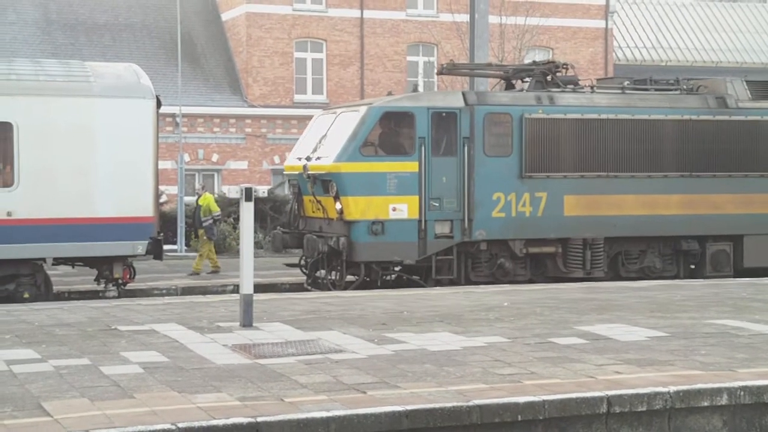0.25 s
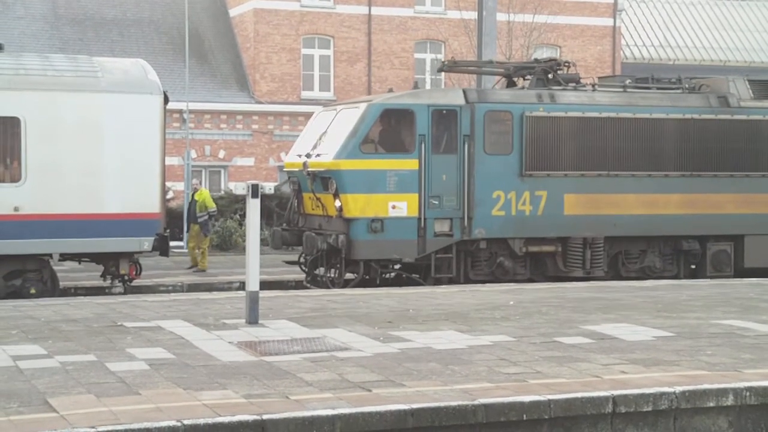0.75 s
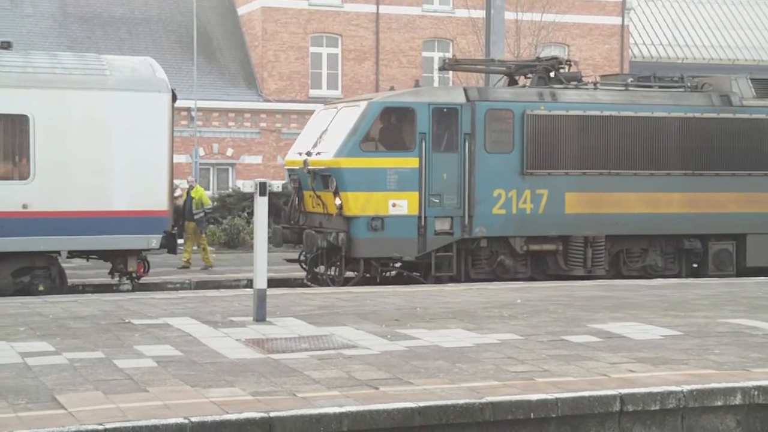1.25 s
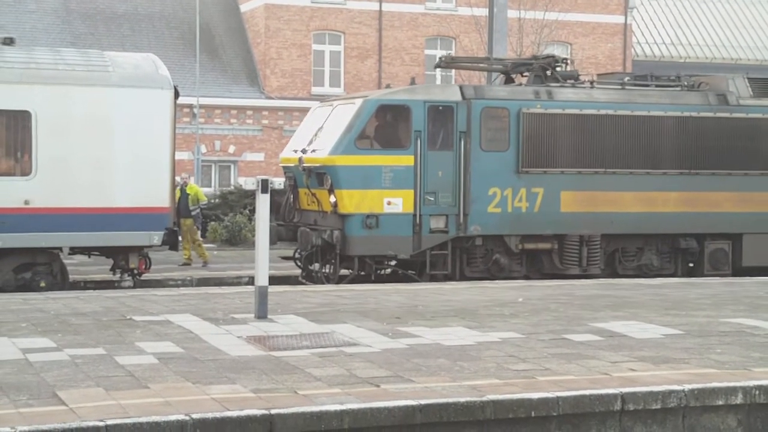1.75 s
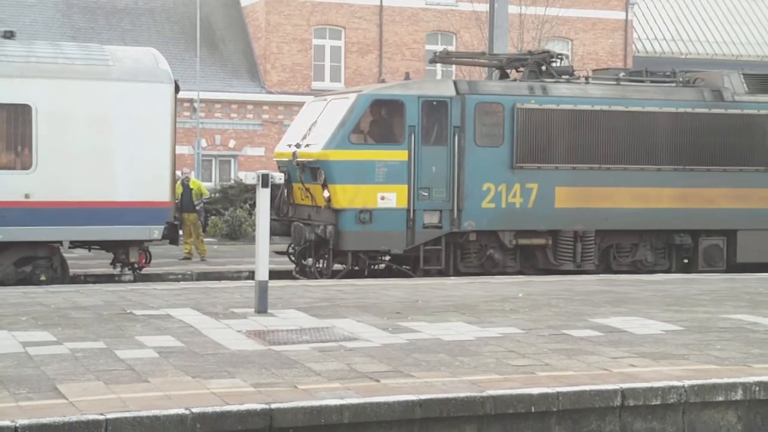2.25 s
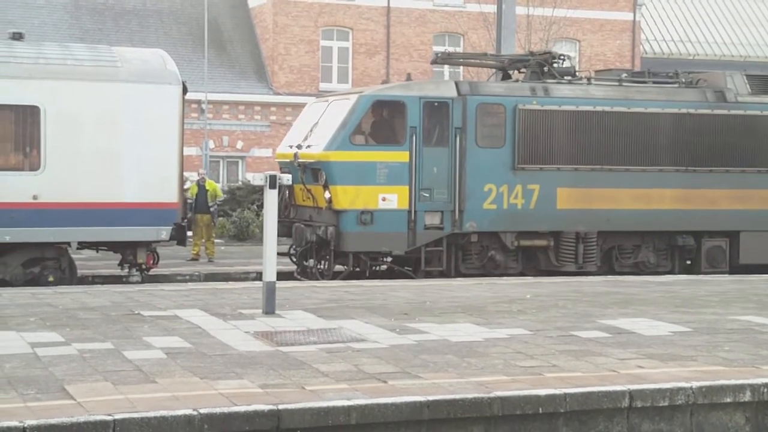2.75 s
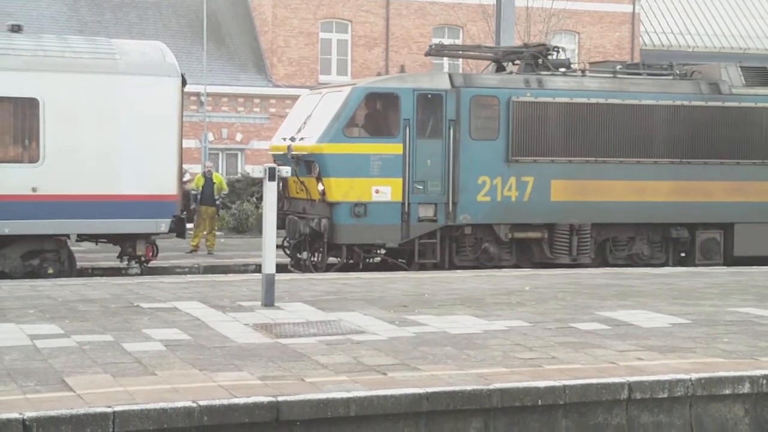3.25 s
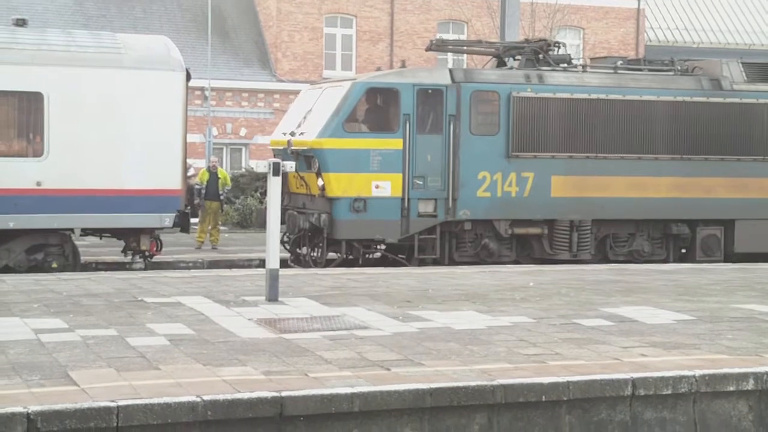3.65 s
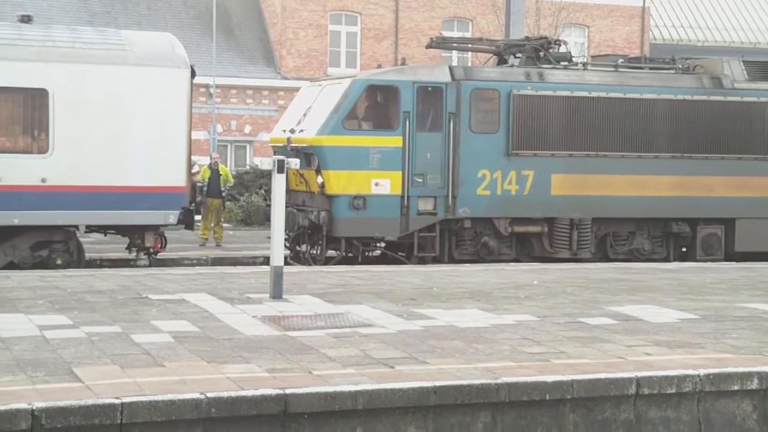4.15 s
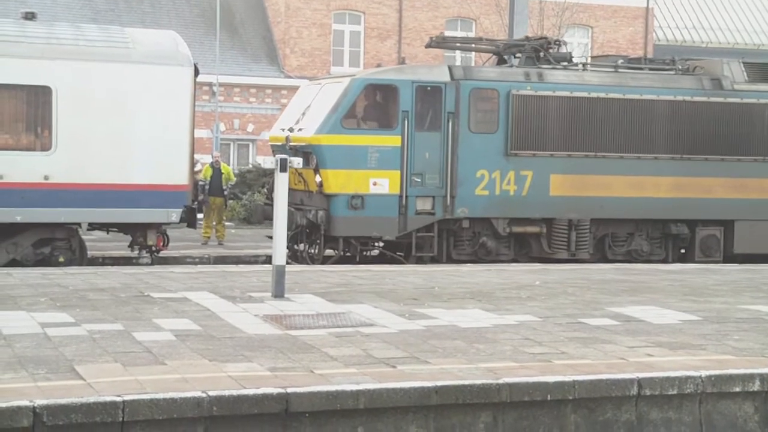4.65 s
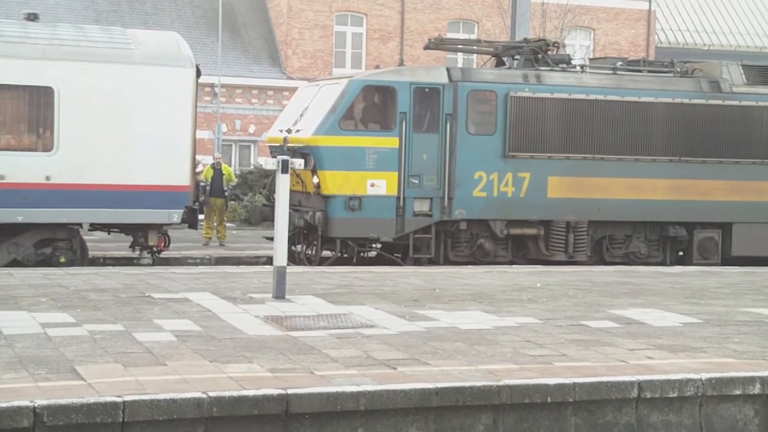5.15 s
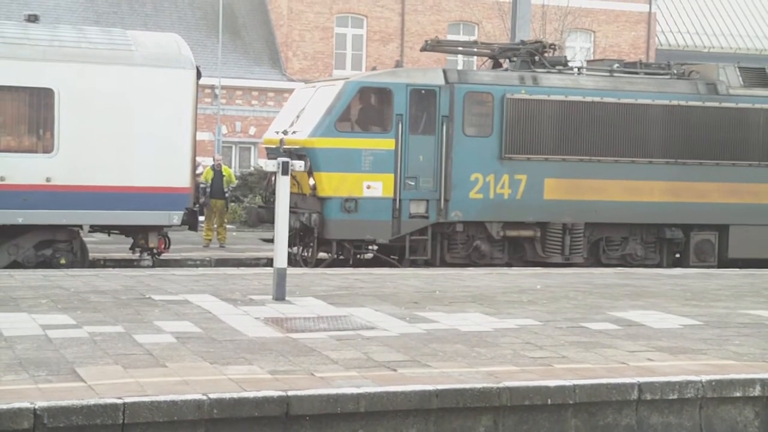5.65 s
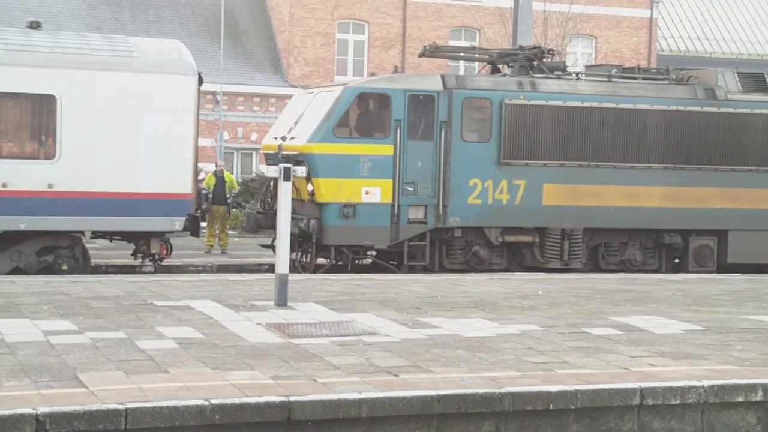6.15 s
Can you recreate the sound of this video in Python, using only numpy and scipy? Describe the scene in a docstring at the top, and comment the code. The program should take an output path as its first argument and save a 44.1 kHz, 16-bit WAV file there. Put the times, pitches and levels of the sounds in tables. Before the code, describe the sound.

An electric locomotive stands at a station with its cooling blowers running. An even, whirring rush of air with a hollow low body continues throughout. Above it sits a thin high fan whine that holds its pitch while gently swelling and throbbing. The rush grows slightly brighter, then eases near the end. It is heard from across the platform.

```python
"""An electric locomotive stands across a station platform with its cooling blowers running.
From the start, turbulent air rushes through resonant ducts and louvres, while fan blade tones whine
over it and a louvre edge whistles faintly. One fan's tone swells and sags; another's throbs.
The rush near 2 kHz grows for about five seconds, then eases. All of it is heard through two narrow
microphone ports that resonate at slightly different pitches."""
import sys
import numpy as np
from scipy import signal
from scipy.fft import rfft, irfft, next_fast_len
from scipy.io import wavfile
from scipy.ndimage import uniform_filter1d

SR = 44100
rng = np.random.default_rng(int(sys.argv[2]) if len(sys.argv) > 2 else 0)


def master(y):
    """Save y as 16-bit WAV."""
    cut = np.clip(np.atleast_2d(y).T, -1, 1)
    pcm = np.round(cut * 32767)  # scale
    wavfile.write(sys.argv[1], SR, pcm.astype(np.int16))


N = 281799


def undb(db):
    """Amplitude ratio of a level: tenfold for every 20 dB."""
    return 10 ** (np.asarray(db) / 20)


def over_hz(table, hz):
    """Columns of a table interpolated on a log-frequency axis."""
    row_hz, *columns = np.transpose(table)
    return [np.interp(np.log(hz), np.log(row_hz), column) for column in columns]


def over_time(table):
    """Columns of a table interpolated linearly in time."""
    time_s, *columns = np.transpose(table)
    return [np.interp(np.arange(N) / SR, time_s, column) for column in columns]


def wander(rate_hz):
    """Low-pass random modulation: held values smoothed twice, with a spread near 1."""
    hold = int(SR / rate_hz)
    steps = np.repeat(rng.standard_normal(N // hold + 1), hold)
    return 1.24 * uniform_filter1d(uniform_filter1d(steps, hold), hold)[:N]


def filtered(channels, response):
    """Linear filtering: each spectrum is multiplied by response(hz); mirrored ends avoid clicks."""
    edge = 4096
    size = next_fast_len(N + 2 * edge)
    padded = np.pad(channels, [(0, 0), (edge, size - N - edge)], mode="reflect")
    hz = np.maximum(np.fft.rfftfreq(size, 1 / SR), 1)
    return irfft(rfft(padded) * response(hz), size)[:, edge:edge + N]


def air_rush(swell_db=.15, flicker_db=.7, bright_hz=2050, bright_reach_octaves=.55):
    """Turbulence makes broadband noise, which duct and louvre resonances lift into peaks."""
    # Spectral density of the cooling air's noise: frequency_hz, level_db
    air_spectrum = [(25, -120), (45, -108), (70, -91), (98, -80.5), (118, -77.5), (142, -62.5), (165, -58),
                    (440, -62), (520, -69.5), (555, -69), (655, -71.5), (800, -69), (1400, -71),
                    (1680, -70.5), (2010, -69.5), (2300, -68.5), (2950, -70.5), (3060, -74.5),
                    (3200, -71.5), (3650, -74.5), (5000, -95.5), (10600, -89)]
    # Duct and louvre resonances: centre_hz, width_hz, peak_db
    duct_modes = [(204, 36, -61), (331, 42, -59.5), (391.5, 40, -59.5), (425.5, 33, -60), (766.6, 39, -66),
                  (953, 250, -72), (1183, 184, -68.5), (193, 9, -59), (315, 10, -60), (347, 12, -62),
                  (387, 9, -58), (437, 10, -61), (600, 28, -68.5), (900, 36, -70.5), (1203, 32, -66.5),
                  (1450, 90, -75), (1110, 16, -73), (1512, 24, -72), (1835, 150, -66.7), (2870, 67, -74),
                  (3478, 445, -73), (4720, 840, -89.5)]
    # Slow lift of the rush around bright_hz: time_s, gain_db
    brightness = [(0, 0), (1.5, 0.9), (3, 2), (5.4, 3), (6.39, 1.3)]
    # Slow load on the blowers: time_s, gain_db
    blower_load = [(0, -0.5), (1.6, -0.33), (3.5, -0.4), (6.39, 0)]
    hz = np.maximum(np.fft.rfftfreq(N, 1 / SR), 1)
    power = undb(over_hz(air_spectrum, hz)[0]) ** 2
    for centre_hz, width_hz, peak_db in duct_modes:
        power += undb(peak_db) ** 2 / (1 + (2 * (hz - centre_hz) / width_hz) ** 2) ** 2
    spectrum = rfft(rng.standard_normal(N)) * np.sqrt(power * SR / 2)
    bright_db = over_time(brightness)[0]
    swell = wander(1.83)
    rush = 0
    for octave in np.arange(4, 14.5, .5):  # half-octave bands swell together and flicker alone
        band_share = np.clip(1 - 2 * np.abs(np.log2(hz) - octave), 0, 1)
        bright_share = np.clip(1.5 * (1 - abs(octave - np.log2(bright_hz)) / bright_reach_octaves), 0, 1)
        gain_db = bright_share * bright_db + swell_db * swell + flicker_db * wander(11)
        rush += irfft(spectrum * band_share, N) * undb(gain_db)
    return undb(over_time(blower_load)[0]) * rush


def blade_tone(pitch_hz, level_db, drift_hz, waver_db):
    """Periodic blade passage makes a tone; turbulence modulates its frequency and amplitude."""
    cycles = np.cumsum(pitch_hz + drift_hz * wander(6)) / SR + rng.random()
    rms = undb(level_db + waver_db * wander(10))
    return np.sqrt(2) * rms * np.sin(2 * np.pi * cycles)


def fan_whine(first_hz=1838.9, second_hz=1788.1, upper_hz=2823):
    """The blade tones of several fans superpose, and those close in pitch beat."""
    # The first fan's tone swells and sags: time_s, level_db
    first_swell = [(0, -48.5), (.15, -46.5), (.38, -53), (.65, -44.3), (1.15, -45), (1.65, -42),
                   (1.85, -43), (2.1, -38.8), (2.5, -42), (2.7, -40.3), (2.95, -41.3), (3.25, -45),
                   (3.5, -41.3), (4.05, -41.8), (4.25, -45), (4.45, -41.7), (4.85, -41.8), (5.05, -46),
                   (5.3, -42.8), (5.6, -44.5), (6, -41.5), (6.25, -47), (6.39, -43.5)]
    # The second fan's tone throbs about twice a second: time_s, level_db
    second_throb = [(0, -49.5), (.2, -52.5), (.5, -48), (.75, -55), (.92, -44.5), (1.15, -46), (1.37, -55),
                    (1.5, -48), (1.72, -55), (2.1, -46.5), (2.33, -42.5), (2.47, -54), (2.65, -45),
                    (2.82, -53), (3, -44), (3.2, -48.5), (3.5, -44.5), (3.68, -53), (3.8, -45), (4.15, -45),
                    (4.55, -49), (4.72, -42), (5, -46.5), (5.2, -54), (5.55, -41.5), (5.75, -43),
                    (5.95, -50), (6.1, -44.5), (6.39, -51)]
    # Slow swell of the second fan's octave and of the upper tone: time_s, octave_db, upper_db
    high_swells = [(0, -60, -55), (.35, -55, -53), (.6, -59, -53), (1, -52.5, -53), (1.5, -62, -60),
                   (2.05, -60, -58), (2.3, -54, -57), (3, -53, -55), (3.4, -53.5, -56), (3.6, -51, -60),
                   (4, -54, -62), (4.2, -61, -52), (4.6, -64, -58), (4.9, -58, -58), (5.5, -59, -56),
                   (6.39, -62, -57)]
    # Fainter, steadier blade tones: pitch_hz, level_db
    faint_tones = [(1886, -58), (1929.6, -53), (1984, -55), (3677.5, -63.5)]
    octave_db, upper_db = over_time(high_swells)
    whine = blade_tone(first_hz, over_time(first_swell)[0], drift_hz=.5, waver_db=.5)
    whine += blade_tone(second_hz, over_time(second_throb)[0], drift_hz=1.1, waver_db=.7)
    whine += blade_tone(2 * second_hz, octave_db, drift_hz=1.2, waver_db=1.2)
    whine += blade_tone(upper_hz, upper_db, drift_hz=2.5, waver_db=1.5)
    for pitch_hz, level_db in faint_tones:
        whine += blade_tone(pitch_hz, level_db, drift_hz=1.1, waver_db=1.8)
    return whine


def louvre_whistle(pitch_hz=4825, width_hz=50):
    """Edge tone: air passing a louvre edge hisses in one narrow band."""
    # The whistle fades, then returns: time_s, level_db
    envelope = [(0, -64), (.6, -70), (1.3, -76), (2.5, -76), (4.3, -77), (5.2, -67), (6.39, -69)]
    band_hz = pitch_hz + width_hz * np.array([-.5, .5])
    hiss = signal.sosfilt(signal.butter(2, band_hz, "band", fs=SR, output="sos"), rng.standard_normal(N))
    return hiss / hiss.std() * undb(over_time(envelope)[0])


def stereo_image(direct_air, scattered_air, tones):
    """Level, phase and likeness of the left and right channels, by frequency."""
    # Left channel against right: frequency_hz, left_minus_right_db, left_lead_rad, correlation
    left_right = [(40, .1, 0, .93), (72, .3, 0, .88), (105, .15, 0, .965), (130, 0, 0, .998),
                  (150, 0, 0, .9995), (180, 0, 0, .9998), (330, 0, .015, .9983), (460, 0, .05, .995),
                  (520, -.1, .07, .988), (600, .6, .11, .971), (690, .7, .04, .974), (800, .35, .06, .985),
                  (900, .2, .04, .986), (1040, .25, .11, .972), (1200, .5, .14, .967),
                  (1370, .7, .07, .965), (1580, .4, .03, .978), (1840, .75, .18, .95), (2100, .9, .2, .95),
                  (2800, 1.1, .27, .94), (3150, .95, .02, .885), (3620, .2, .02, .94),
                  (4150, .35, .08, .89), (4800, -.4, .04, .905), (5500, 0, .08, .86), (6200, -3, .25, .57),
                  (7000, -3, 1.4, .72), (7500, 0, 1.4, .86), (8100, 2, 1.05, .72), (9400, 1.5, 1.05, .53),
                  (10500, -.3, .2, .71)]
    opposite, both = np.array([[1], [-1]]), np.ones((2, 1))

    def correlation(hz):
        return np.clip(over_hz(left_right, hz)[2], 0, 1)

    def panning(hz):
        pan_db, lead_rad, _ = over_hz(left_right, hz)
        return undb(opposite * pan_db / 2) * np.exp(1j * opposite * lead_rad / 2)

    in_phase = filtered(both * direct_air, lambda hz: np.sqrt((1 + correlation(hz)) / 2))
    antiphase = filtered(opposite * scattered_air, lambda hz: np.sqrt((1 - correlation(hz)) / 2))
    return filtered(in_phase + antiphase + both * tones, panning)


def port_resonance(hz):
    """Helmholtz resonance: each port is a small cavity with a second-order response."""
    # Cavity resonances of the left and right ports: centre_hz, width_hz
    cavities = [(7626, 680), (7350, 580)]
    return np.array([1 / (1 - (hz / centre_hz) ** 2 + 1j * hz * width_hz / centre_hz ** 2)
                     for centre_hz, width_hz in cavities])


def scene():
    """Superposition at the two ports: direct and scattered rush, fan whine and louvre whistle."""
    return stereo_image(direct_air=air_rush(), scattered_air=air_rush(),
                        tones=fan_whine() + louvre_whistle())


def record(dry, treble_fall_hz=10790, treble_end_hz=11600, hiss_from_hz=13200, top_hz=15150):
    """Resonance and band limiting: the ports ring, the treble ends steeply, faint hiss lies higher."""
    heard = filtered(dry, port_resonance)
    heard = signal.sosfilt(signal.cheby1(8, .3, treble_fall_hz, fs=SR, output="sos"), heard)
    heard = signal.sosfilt(signal.ellip(10, .3, 50, treble_end_hz, fs=SR, output="sos"), heard)
    common, left, right = rng.standard_normal((3, N))
    hiss = undb(-68) * (common + 0.92 * np.array([left, right]))
    hiss = signal.sosfilt(signal.ellip(8, .5, 70, hiss_from_hz, "high", fs=SR, output="sos"), hiss)
    return signal.sosfilt(signal.ellip(12, .3, 60, top_hz, fs=SR, output="sos"), heard + hiss)


dry = scene()
out = record(dry)
master(out)
```